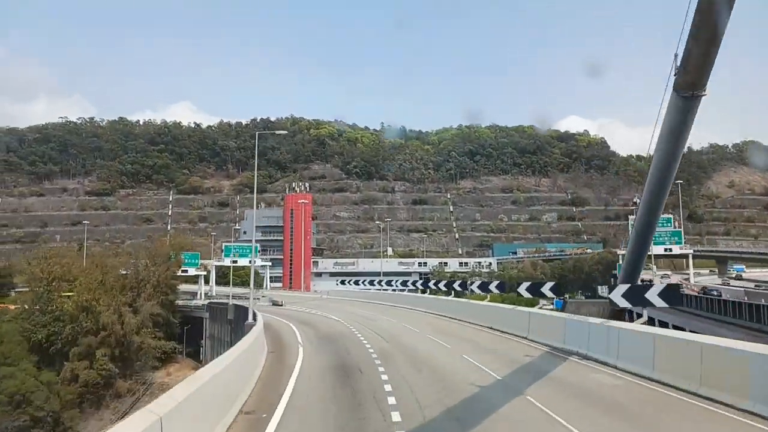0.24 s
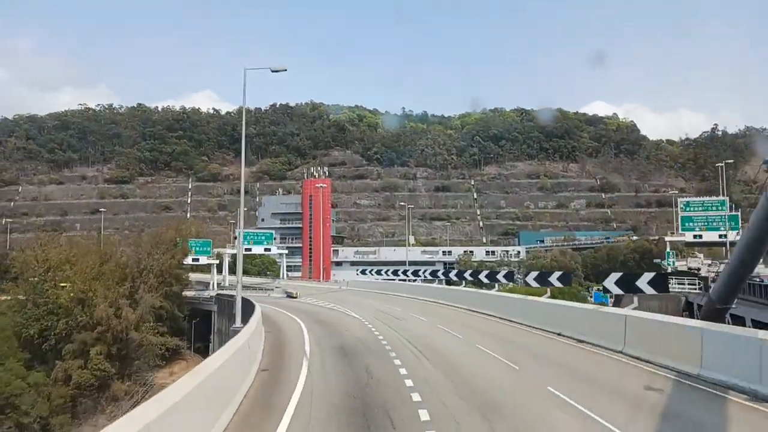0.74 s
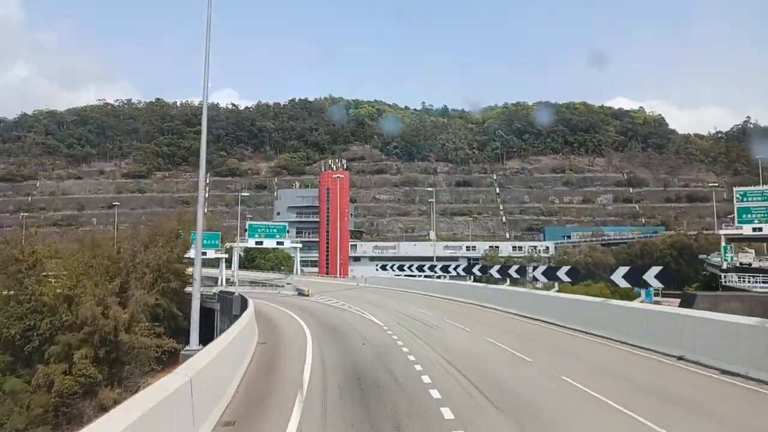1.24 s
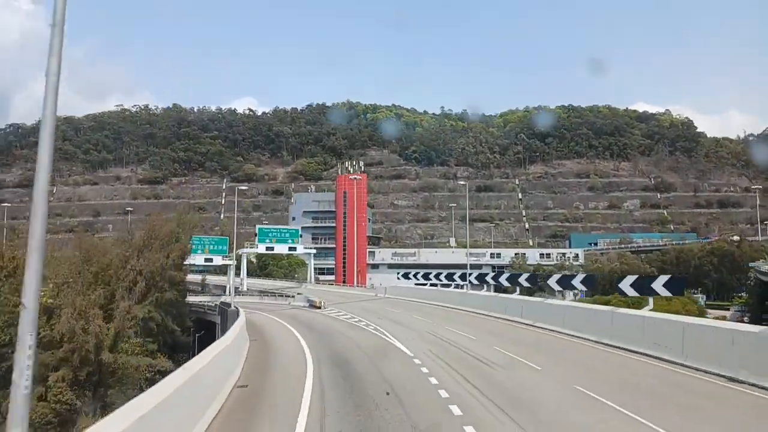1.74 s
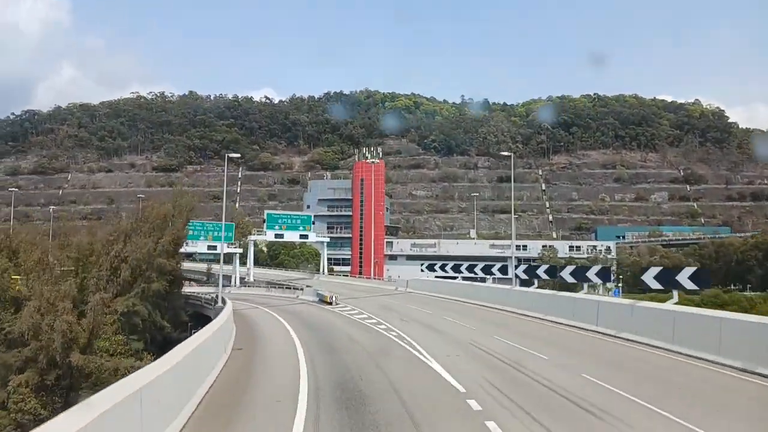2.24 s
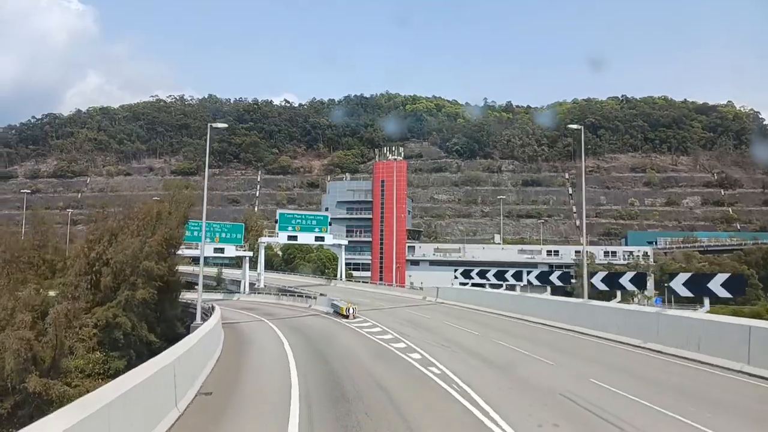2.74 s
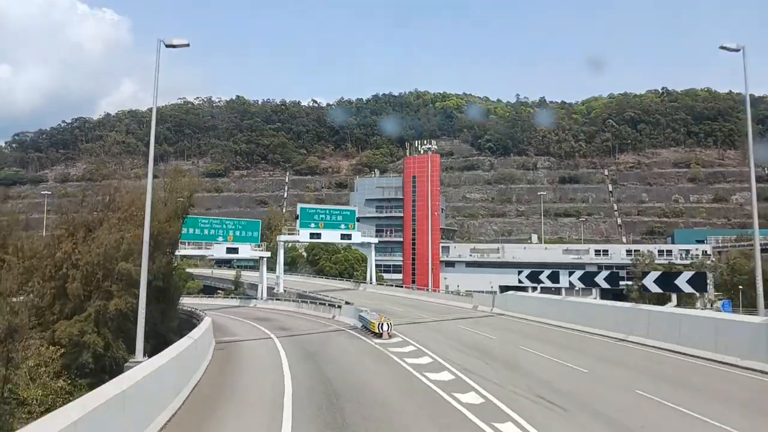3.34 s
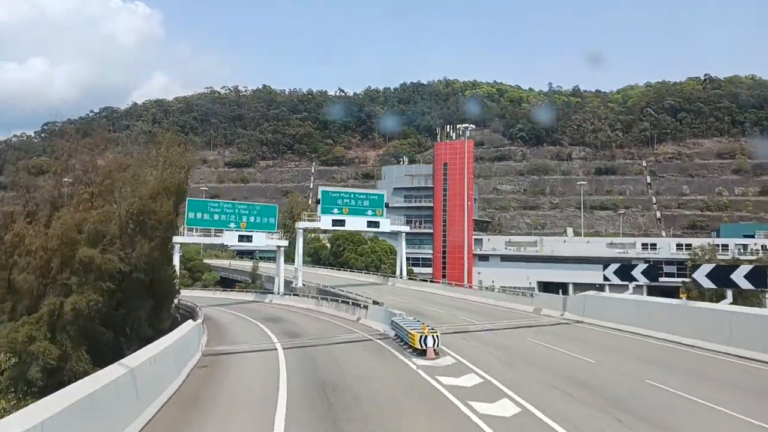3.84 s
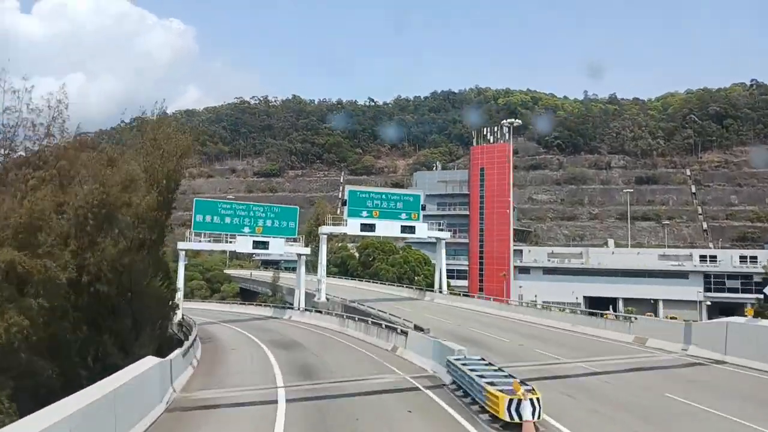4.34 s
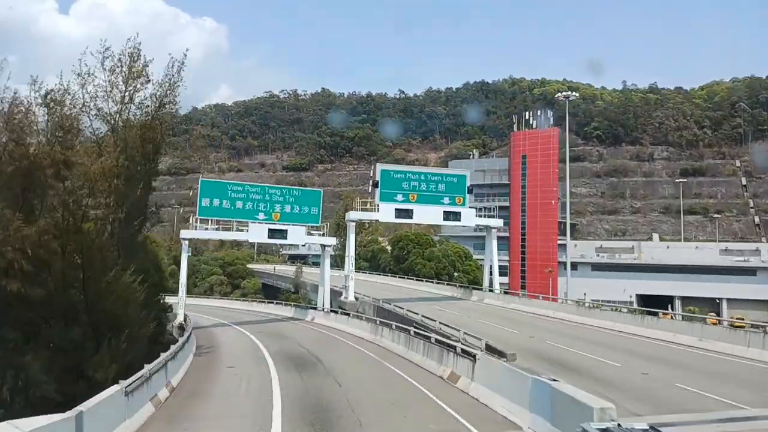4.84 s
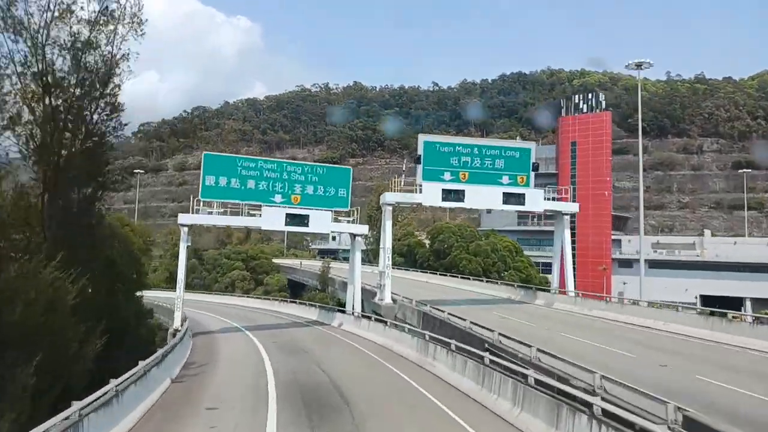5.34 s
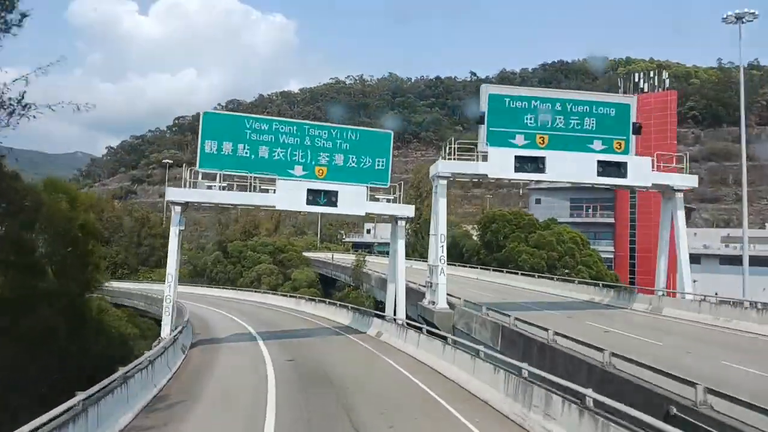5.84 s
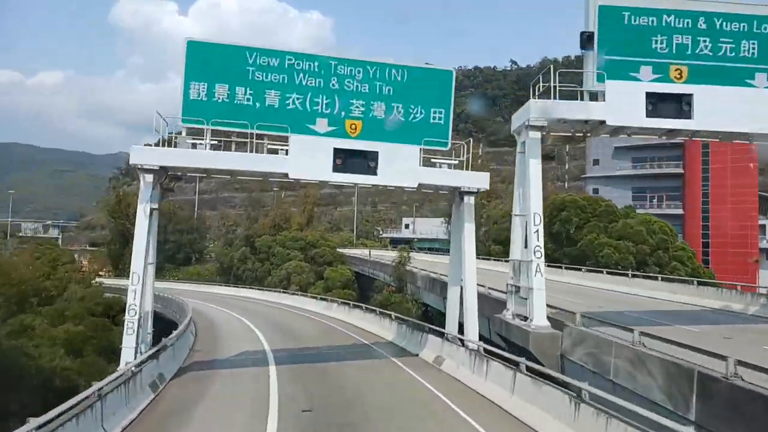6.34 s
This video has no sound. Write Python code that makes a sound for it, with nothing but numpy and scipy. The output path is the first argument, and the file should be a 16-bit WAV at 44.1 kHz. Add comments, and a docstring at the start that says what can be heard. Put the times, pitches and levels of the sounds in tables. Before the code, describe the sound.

A bus interior on a curving highway ramp, heard in stereo from among the seats with a short, dense cabin echo. Throughout, a deep, wavering road boom and body sway sit under muffled tyre roar, soft air hiss and a low drivetrain drone that sinks slightly in pitch, with faint gear whine. A light tick opens it; from 0.4 to 1.4 seconds bumps swell the rumble and loose fittings clack, knock and chatter, with smaller rattles to about 2.2. From 1.7 to 5.6, thin, quiet high squeals come in spells, pulsing roughly eleven times a second and gradually slowing, like a rubbing brake. The boom swells near 3.4 with a soft rattle at 3.3; another light rattle comes at 4.2. The drone strengthens towards 5.5. Between 5.5 and 6.3, fresh bumps bring a tight cluster of sharp clacks, jingling trim and two tiny squeaks around 6.1-6.2, then the rumble eases until 6.6.

```python
"""Inside a bus on a curving highway ramp, heard by two microphones from among the windows and seats.
Shaped noise makes the body boom on the road, the tyres roar and the air hiss; wavering sines make
the drivetrain drone as it slows a little. Rough stretches shake loose fittings into rattles and knocks:
bursts of noise that ring in the cabin. Between them something that rubs, perhaps a brake, sings in
thin squeals: high sines that pulse with the turning wheel, next to short squeaks of the trim."""
import sys
import numpy as np
from scipy import signal
from scipy.fft import rfft, irfft, next_fast_len
from scipy.io import wavfile
from scipy.ndimage import uniform_filter1d, map_coordinates

SR = 44100
rng = np.random.default_rng(int(sys.argv[2]) if len(sys.argv) > 2 else 0)


def master_out(mix):
    """Clip the mix to full scale and print it as 16-bit PCM to the path in sys.argv[1]."""
    frames = np.transpose(np.atleast_2d(mix))
    ceiling = np.clip(frames, -1, 1)
    pcm = np.round(ceiling * 32767).astype(np.int16)
    wavfile.write(sys.argv[1], SR, pcm)


N = 291043


def amp(db):
    """Decibels to gain."""
    return 10 ** (np.asarray(db) / 20)


def unit(x):
    """Scale to rms 1."""
    return x / np.sqrt(np.mean(x ** 2) + 1e-20)


def along(points, hz):
    """Read (Hz, value) points on a log frequency axis."""
    point_hz, value = np.transpose(points)
    return np.interp(np.log(hz + 1), np.log(point_hz + 1), value)


def curves(rows):
    """One value per sample for each column after the time in seconds."""
    seconds, *columns = np.transpose(rows)
    return [np.interp(np.arange(N) / SR, seconds, column) for column in columns]


def wobble(rate):
    """A smooth random curve with rate knots a second."""
    knots = rng.standard_normal(int(N * rate / SR) + 4)
    return map_coordinates(knots, [np.arange(N) * rate / SR])


def filtered(x, response):
    """Multiply the spectrum of x by a response of frequency."""
    size = next_fast_len(N + SR // 2)
    hz = np.fft.rfftfreq(size, 1 / SR)
    return irfft(rfft(x, size) * response(hz), size)[..., :N]


def resonances(peaks, floor):
    """A response with a bell at each (Hz, half width Hz, dB) row, standing on a flat floor."""
    return lambda f: floor + sum(amp(db) / (1 + ((f - hz) / width) ** 2) for hz, width, db in peaks)


# How alike the two channels are. Each row: frequency in Hz, left-right correlation (no unit, held within +-1).
CHANNEL_LIKENESS = [(30, 0.66), (70, 0.79), (140, 1.05), (270, 0.83), (500, 0.82), (750, 0.48),
                    (1100, -0.46), (2000, 0.08), (4000, 0), (12000, 0)]


def rush(spectrum):
    """Stereo noise of rms 1: a shared mid and an opposed side set the channels' likeness by frequency."""
    def mid_and_side(hz):
        turn = np.arccos(np.clip(along(CHANNEL_LIKENESS, hz), -1, 1)) / 2
        return amp(along(spectrum, hz)) * [np.cos(turn), np.sin(turn)]
    mid, side = filtered(rng.standard_normal((2, N)), mid_and_side)
    return unit(np.array([mid + side, mid - side]))


def steady(x, span):
    """Even out swells slower than span seconds."""
    power = uniform_filter1d(np.mean(x ** 2, axis=0), max(int(span * SR), 9))
    return x / np.sqrt(np.abs(power) + 1e-9)


def tone(hz, spread=0):
    """A sine of rms 1 on a pitch curve; spread is the phase between the channels in radians."""
    phase = 2 * np.pi * np.cumsum(hz) / SR
    return np.sqrt(2) * np.sin([phase + spread / 2, phase - spread / 2])


# Echo of the closed bus. Each row: frequency in Hz, time to fall by 60 dB in seconds.
CABIN_DECAY = [(500, 0.18), (2500, 0.27), (12000, 0.2)]


def cabin(x, wet_db):
    """Add the short, dense echo of windows and seats: noise that dies at its own rate in each band."""
    hz, t, noise = signal.stft(rng.standard_normal((2, SR // 3)), SR, nperseg=256)
    decay = amp(-60 * t / along(CABIN_DECAY, hz)[:, None])
    tail = signal.istft(noise * decay, SR, nperseg=256)[1]
    tail = tail / np.linalg.norm(tail[0])
    return x + amp(wet_db) * signal.fftconvolve(x, tail, axes=1)[:, :N]


# The wheels cross joints and patches. Each row: start in seconds, length in seconds, shake in dB.
ROAD_JOINTS = [(0.453, 0.32, 10), (0.844, 0.18, 5.5), (1.27, 0.07, 4), (5.515, 0.25, 6), (5.985, 0.13, 6.5)]
BUMP_RISE_S, BUMP_RELEASE_S = 0.056, 0.077


def shake():
    """Extra vibration in dB: each bump builds up, holds and dies away."""
    t = np.arange(N) / SR
    total_db = np.zeros(N)
    for start, length, db in ROAD_JOINTS:
        rise = np.clip((t - start) / BUMP_RISE_S, 0, 1)
        release = np.exp(-np.maximum(t - start - length, 0) / BUMP_RELEASE_S)
        total_db += db * rise * release
    return total_db


# Boom of the road surface, before bumps. Each row: time in seconds, level in dB.
SURFACE_BOOM = [(0, -32), (1.15, -25.5), (2.25, -34.5), (2.75, -32.5), (3.45, -22.5), (3.8, -27),
                (4.6, -27), (5.3, -28.5), (6.3, -26), (6.6, -33)]
# Deep sway of the bus body. Each row: time in seconds, level in dB.
BODY_SWAY = [(0, -35), (0.4, -26.5), (0.9, -35), (1.9, -32.5), (3.0, -29), (4.8, -47), (5.35, -29),
             (5.6, -25.5), (6.15, -23.5), (6.6, -32)]
# Roar of the tyres, before bumps. Each row: time in seconds, level in dB.
TYRE_LEVEL = [(0, -36), (0.5, -36), (1.0, -39), (1.95, -41.5), (3.3, -37), (4.9, -38), (5.6, -37),
              (6.15, -38.5), (6.6, -44)]
# Colours of sway, boom, body panels, tyres and air. Each row: frequency in Hz, relative level in dB per Hz.
SWAY_SPECTRUM = [(15, -32), (26, -19), (34, 1.5), (48, -3.5), (58, -6.5), (90, -50), (150, -120)]
BOOM_SPECTRUM = [(15, -42), (25, -14), (32, -2.5), (42, 0), (52, -1.5), (66, 1.5), (80, -2), (102, -9),
                 (125, -16.5), (160, -50), (280, -120)]
PANEL_SPECTRUM = [(62, -34), (105, -2), (135, 1), (178, -8.5), (209, -3), (242, -5.5), (275, -11.5),
                  (300, -21), (390, -34), (660, -120)]
TYRE_SPECTRUM = [(160, -29), (270, -6.5), (310, -9.5), (380, -6), (490, -10), (630, -8), (690, -11.5),
                 (760, -13), (920, -17.5), (1500, -24), (1950, -42.5), (3300, -120)]
AIR_SPECTRUM = [(590, -5.5), (1000, -10), (1150, 5.5), (1410, -20.5), (1550, -3.5), (2460, -6.5),
                (3600, -15), (4190, -12), (4380, -19.5), (6350, -29.5), (12700, -31), (15800, -38)]
# Base level in dB; dB per dB of surface boom (panels) or tyre roar (air); dB per dB of shake.
PANEL_DB, PANEL_FOLLOWS, PANEL_SHAKE = -38.5, 0.29, 0.89
AIR_DB, AIR_FOLLOWS, AIR_SHAKE = -48, 0.83, 0.51
TYRE_SHAKE = 0.31  # dB of roar per dB of shake


def road():
    """The road sways the body and shakes its panels; tyres roar and air hisses along the glass."""
    (surface_db,), (tyre_db,), (sway_db,) = curves(SURFACE_BOOM), curves(TYRE_LEVEL), curves(BODY_SWAY)
    shake_db = shake()
    panel_db = PANEL_DB + PANEL_FOLLOWS * (surface_db - surface_db.mean()) + PANEL_SHAKE * shake_db
    air_db = AIR_DB + AIR_FOLLOWS * (tyre_db - tyre_db.mean()) + AIR_SHAKE * shake_db
    boom = amp(surface_db + shake_db + 0.2) * steady(rush(BOOM_SPECTRUM), span=0.16)
    panels = amp(panel_db) * steady(rush(PANEL_SPECTRUM), span=0.16)
    sway = amp(sway_db) * steady(rush(SWAY_SPECTRUM), span=0.18)
    tyres = amp(tyre_db + TYRE_SHAKE * shake_db) * rush(TYRE_SPECTRUM)
    air = amp(air_db) * rush(AIR_SPECTRUM)
    return sway + boom + panels + tyres + air


# Drone of the drivetrain. Each row: time in seconds, pitch in Hz.
DRONE_PITCH = [(0, 285), (1.5, 280), (3, 275.5), (4.5, 272.5), (5.6, 271.3), (6.6, 271.5)]
# Whine of the gears. Each row: time in seconds, pitch in Hz.
WHINE_PITCH = [(0.3, 741), (1.5, 760.5), (3, 747), (4.5, 742.7), (5.6, 734.4), (6.6, 738)]
# Load on the drivetrain. Each row: time in seconds, drone level in dB, gear whine level in dB.
DRIVE_LOAD = [(0, -43, -65), (0.33, -61, -42), (0.55, -46, -51.5), (1.4, -49.5, -54), (2.7, -49.5, -55),
              (3.15, -43, -49), (4.1, -43, -50.5), (4.6, -39.5, -45), (5.55, -36, -48), (5.9, -43.5, -52),
              (6.6, -42, -52)]
FIRING_DB, MESH_DB = -6.5, -49  # firing throb re the surface boom; steady hum of the gear mesh
MESH_RATIO = 1.352  # mesh pitch re the drone


def drivetrain():
    """Engine firing throbs two octaves under the drone, swelling with the boom; gears hum and whine above it."""
    (drone_hz,), (whine_hz,) = curves(DRONE_PITCH), curves(WHINE_PITCH)
    drone_db, whine_db = curves(DRIVE_LOAD)
    firing_db = FIRING_DB + curves(SURFACE_BOOM)[0] + 0.55 * shake()
    # each part wavers a little in level (dB) and pitch (Hz)
    firing = amp(firing_db + 2.6 * wobble(6.1)) * tone(drone_hz / 4 + 1.5 * wobble(9))
    drone = amp(drone_db + 0.78 * wobble(15)) * tone(drone_hz + 0.51 * wobble(14), spread=0.069)
    mesh = amp(MESH_DB + 2.2 * wobble(14)) * tone(MESH_RATIO * drone_hz + 1.24 * wobble(25), spread=0.47)
    whine = amp(whine_db + 1.1 * wobble(15)) * tone(whine_hz + 1.5 * wobble(25.36), spread=0.99)
    return firing + drone + mesh + whine


# Chatter of loose trim, echo included. Each row: time in seconds, level in dB.
CHATTER_LEVEL = [(0, -38), (0.22, -63.5), (0.45, -48.5), (0.8, -42.5), (1.0, -50), (1.45, -48), (1.9, -59),
                 (2.85, -59.5), (3.28, -46.5), (3.5, -56), (3.7, -51), (4.2, -51), (4.55, -60.5),
                 (5.05, -62), (5.5, -50), (5.74, -41.5), (6.25, -43), (6.45, -54.5)]
# Colour of the trim before it rings. Each row: frequency in Hz, relative level in dB per Hz.
TRIM_SPECTRUM = [(880, -44), (1500, 2.5), (1740, -5), (2740, -5.5), (3570, -6), (5090, -6.5), (6140, -16.5),
                 (8010, -16), (8920, -14.5), (11900, -14.5), (15800, -24)]
# Small loose parts ring. Each row: frequency in Hz, half width in Hz, strength in dB.
JINGLE_MODES = [(2460, 60, 4), (2630, 54, -8), (9100, 89, -2)]


def chatter():
    """Many tiny random contacts of loose trim each set off dying noise; small parts jingle high up."""
    struck = rng.random(N) < 130 / SR  # about 130 contacts a second
    contacts = struck * amp(np.minimum(4 * rng.exponential(size=N), 14))
    t = np.arange(SR // 10) / SR
    decay = amp(-120 * t / 0.14)  # of power: each contact falls at 60 dB per 0.14 s
    power = np.abs(signal.fftconvolve(contacts ** 2, decay)[:N])
    trim = filtered(rush(TRIM_SPECTRUM), resonances(JINGLE_MODES, floor=1))
    return amp(curves(CHATTER_LEVEL)[0]) * unit(cabin(np.sqrt(power) * trim, wet_db=7.0))


# Short squeaks of the trim. Each row: centre in seconds, pitch in Hz, level in dB, half length in seconds.
TRIM_SQUEAKS = [(4.215, 9240, -50.5, 0.012), (5.32, 7500, -58, .01), (5.385, 2360, -53.5, 0.081),
                (6.108, 1165, -35.5, 0.012), (6.203, 1180, -36, 0.014)]


def squeaks():
    """Trim slips and sings on one slightly wavering note for a moment."""
    t = np.arange(N) / SR
    waver, flutter_db = 0.005 * wobble(200), 1.5 * wobble(120)
    out = np.zeros((2, N))
    for centre, hz, db, half_length in TRIM_SQUEAKS:
        swell = np.exp(-np.abs((t - centre) / half_length) ** 1.25)
        out += amp(db + flutter_db) * swell * tone(hz * (1 + waver), spread=1.0)
    return cabin(out, wet_db=-13)


# Loose fittings strike. Each row: start in seconds, strength in dB, treble in dB re strength, rise in seconds.
FITTING_STRIKES = [(0.07, -34, -10, .001), (0.401, -25, -15.5, 0.0016), (0.616, -32.5, -20, .002),
                   (0.700, -23.5, -12.5, 0.013), (0.828, -22, -15.5, 0.0042), (1.064, -38.5, -12, .0015),
                   (1.238, -30, -19.5, 0.0011), (1.31, -22, -16.5, 0.0036), (1.680, -30, -11, 0.0079),
                   (1.719, -31, -15.5, .004), (2.075, -36.5, -10.5, 0.0087), (2.219, -45, -17, .002),
                   (2.65, -45, -12, .002), (3.28, -26.5, -11, 0.024), (4.192, -34, -6, 0.022),
                   (5.2, -40, -18.5, 0.0033), (5.733, -27.5, -20, .005), (5.911, -25.5, -12, 0.002),
                   (6.0073, -22.5, -10, 0.0023), (6.060, -22.5, -17, 0.0024), (6.094, -26.5, -13, .002),
                   (6.244, -27.5, -14.5, 0.0011), (6.28, -33.5, -14, 0.0013)]
# Colours of the clack and the tick. Each row: frequency in Hz, relative level in dB per Hz.
CLACK_SPECTRUM = [(530, -36), (900, -3), (1050, -1), (1160, 0), (1280, -4), (1470, -1), (2110, 1),
                  (3380, -2), (3750, -4), (5260, -6), (7500, -29), (9750, -49), (16500, -120)]
TICK_SPECTRUM = [(3530, -3), (6000, -3), (7290, -6), (8330, -4.5), (9140, -1), (12100, -2.5), (15800, -12)]
# The fittings ring. Each row: frequency in Hz, half width in Hz, strength in dB.
FITTING_MODES = [(1746, 15, 7), (2090, 55, -4.5), (2460, 220, -3), (3300, 58, 1), (4200, 390, -5)]


def rattles():
    """Each strike is a rough burst: a ringing clack, a bright tick and a dull knock in the panel behind."""
    t = np.arange(SR // 5) / SR
    low, high = np.zeros((2, N + SR))
    for start, db, treble_db, rise in FITTING_STRIKES:
        blow = amp(db - 60 * t / 0.06) * (1 - np.exp(-t / max(rise, 1e-4)))  # falls 60 dB in 0.06 s
        first = round(start * SR)
        low[first:][:len(t)] += blow
        high[first:][:len(t)] += amp(treble_db) * blow
    ringing = unit(filtered(rush(CLACK_SPECTRUM), resonances(FITTING_MODES, floor=0.78)))
    clack = amp(0.5) * low[:N] * ringing
    tick = amp(7.0) * high[:N] * rush(TICK_SPECTRUM)
    panel = rush([(100, -27), (250, 5.5), (700, 3.5), (1500, -27), (3000, -60)])  # (Hz, dB per Hz)
    knock = amp(-9.5) * low[:N] * panel
    contacts = amp(2.52 * wobble(600))  # fast flicker: a cluster of contacts
    return cabin((clack + tick + knock) * contacts, wet_db=0.0)


# Spells of squealing. Each row: start in seconds, end in seconds, pitch in Hz, level in dB, octave in dB
# re level, dip between rubs in dB, weakening of every second rub in dB, lag of the rub in seconds.
SQUEAL_SPELLS = [(1.678, 2.59, 4104, -53, -18, 14, 3.5, 0.00059),
                 (2.689, 2.78, 4100, -50.5, -15, 12, 3, -.004),
                 (2.886, 3.482, 4104, -48.5, -19, 11, 1, 0.012), (3.73, 3.80, 4100, -56, -28, 7, 2, 0),
                 (3.898, 4.333, 4090, -52, -25, 8, 0.5, -0.0095),
                 (4.404, 5.188, 4100, -53.5, -28, 13, 4, 0.0075),
                 (5.21, 5.60, 4110, -54, -29, 10, -2.5, -0.0013),
                 (1.62, 2.653, 2443, -59, -5.5, 7, 0, 0.036),
                 (2.939, 3.42, 2460, -52, -9.5, 6, -0.5, 0.064),
                 (3.679, 4.116, 2453, -56.5, -5.5, 7, -6, 0.044),
                 (4.29, 4.53, 2453, -54, -3.5, 11, -3.5, .04), (4.699, 4.90, 2445, -57.5, -3, 9, 4, 0.037),
                 (5.351, 5.57, 2440, -65, 1, 11, -7, 0.053), (1.75, 2.22, 2683, -64.5, -37, -1, -3, 1),
                 (2.79, 3.40, 2674, -65.5, -33, 0, -8, 0.0051),
                 (3.987, 4.16, 2665, -68, -27, -9, -7, -0.0044)]
WHEEL_HZ, WHEEL_SLOWS_HZ_PER_S, FIRST_RUB_S = 5.68, 0.14, 1.668
RUB_FADE_S, RUB_FLUTTER_DB = 0.032, 3  # fade of a spell; roughness of the rub


def squeals():
    """A brake, perhaps, rubs twice per wheel turn; in spells a high mode and its octave sing roughly."""
    t = np.arange(N) / SR
    out = np.zeros((2, N))
    waver, flutter_db = 0.0031 * wobble(130), RUB_FLUTTER_DB * wobble(45)
    for start, end, hz, db, octave_db, dip_db, uneven_db, lag in SQUEAL_SPELLS:
        spell = np.clip(np.minimum(t - start, end - t) / RUB_FADE_S + 0.5, 0, 1)
        on = spell > 0
        since = t[on] - FIRST_RUB_S - lag
        angle = 2 * np.pi * (WHEEL_HZ * since - WHEEL_SLOWS_HZ_PER_S * since ** 2 / 2)
        pulse_db = -dip_db * np.sin(angle) ** 2 - uneven_db * np.sin(angle / 2) ** 2
        rub = spell[on] * amp(db + pulse_db + flutter_db[on])
        pitch = hz * (1 + waver[on])
        octave = amp(octave_db) * tone(2 * pitch, spread=1.0)
        out[:, on] += rub * (tone(pitch, spread=1.0) + octave)
    return cabin(out, wet_db=-13)


def balanced(x, left_minus_right):
    """Set the left-right balance of the two microphones by band, the summed power of both gains unchanged."""
    def gains(hz):
        return np.sqrt(2 / (1 + amp(np.outer([-2, 2], along(left_minus_right, hz)))))
    return filtered(x, gains)


# Left-right balance of the two microphones by band, the right one duller around 8 kHz and at the top;
# rattles have their own, milder balance. Each row: frequency in Hz, left minus right in dB.
MICROPHONE_BALANCE = [(100, 0), (160, -4.5), (270, 0), (740, -2.5), (1220, -5.5), (2010, -10), (3330, 1),
                      (5500, 2), (6600, 14), (8000, 28), (9200, 15), (10000, 0), (12500, 4), (14500, 25)]
RATTLE_BALANCE = [(250, -1), (1200, -4), (2000, -5), (3300, -3.5), (6000, 6), (12000, 5.5)]


def scene():
    """All sources, summed at the two microphones with their left-right balance."""
    bus = road() + drivetrain() + chatter() + squeaks() + squeals()
    return balanced(bus, MICROPHONE_BALANCE) + balanced(rattles(), RATTLE_BALANCE)


TOP_HZ = 16050


def record(dry):
    """The microphone chain keeps nothing above its band limit."""
    return filtered(dry, lambda hz: hz < TOP_HZ)


dry = scene()
out = record(dry)
master_out(out)
```